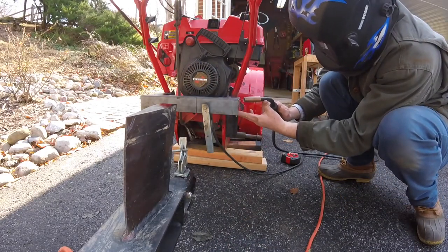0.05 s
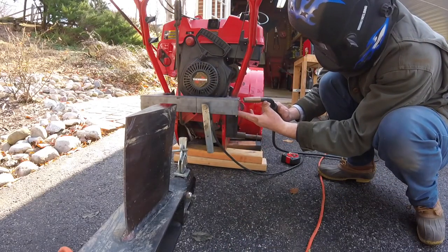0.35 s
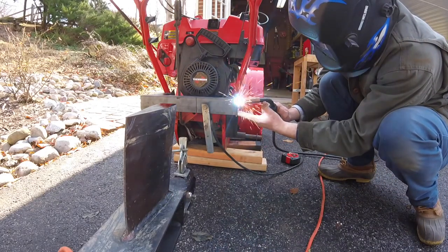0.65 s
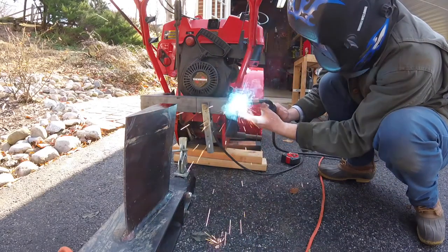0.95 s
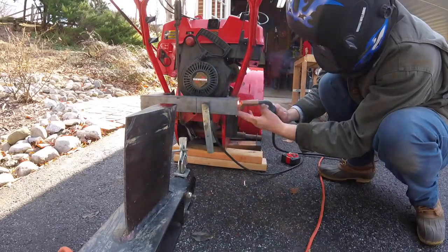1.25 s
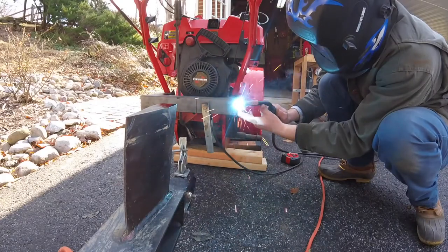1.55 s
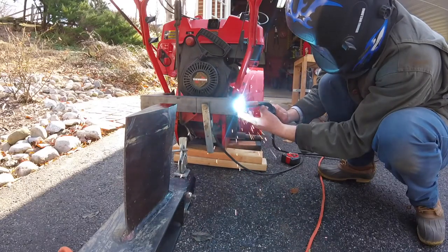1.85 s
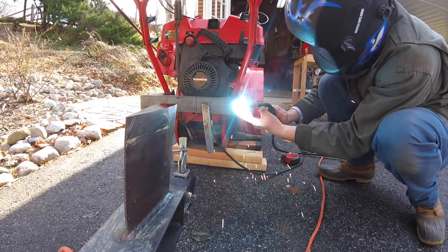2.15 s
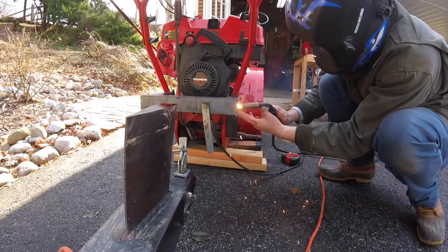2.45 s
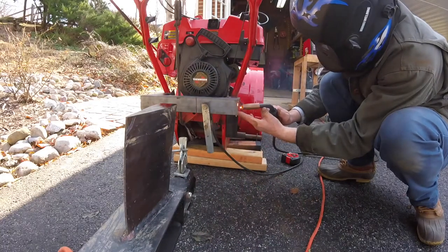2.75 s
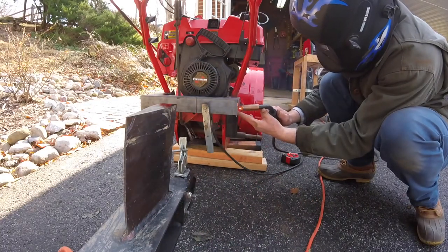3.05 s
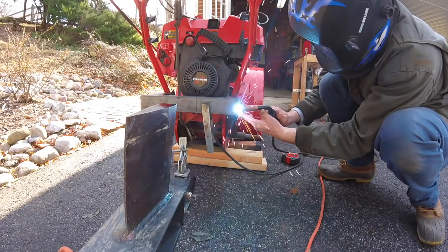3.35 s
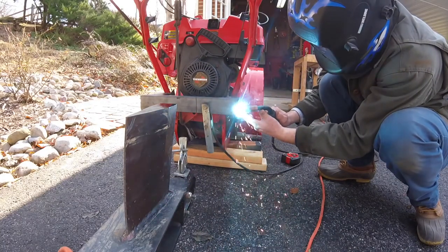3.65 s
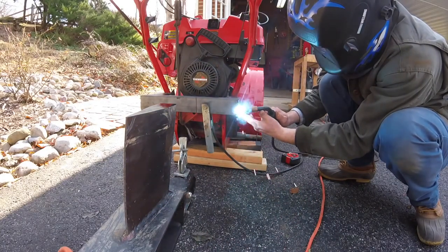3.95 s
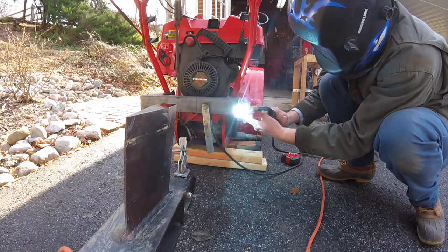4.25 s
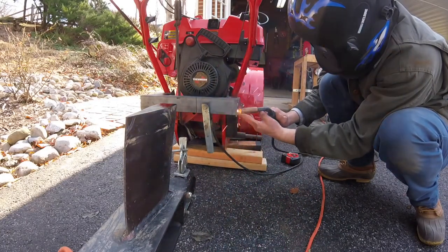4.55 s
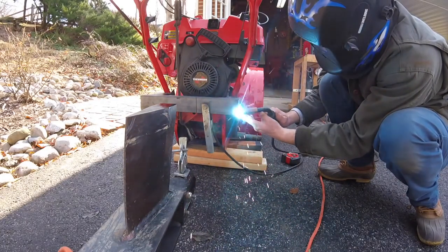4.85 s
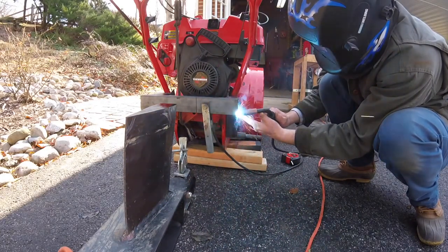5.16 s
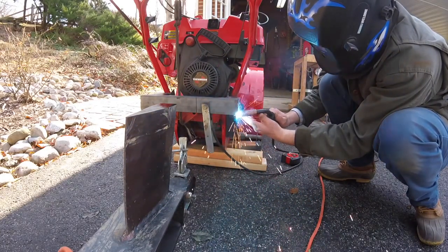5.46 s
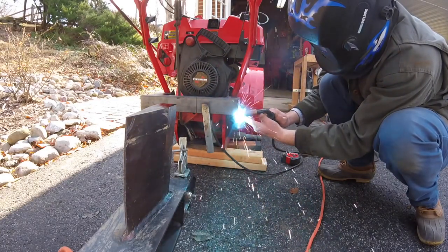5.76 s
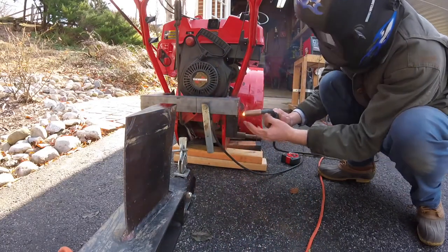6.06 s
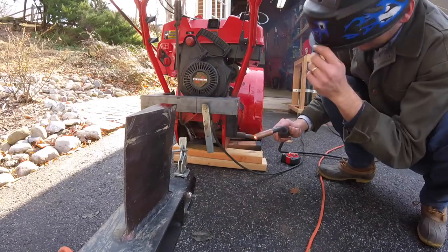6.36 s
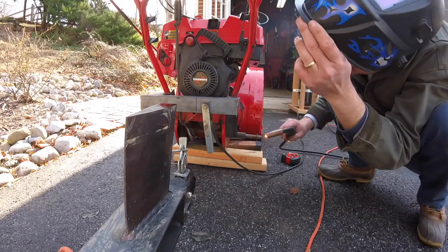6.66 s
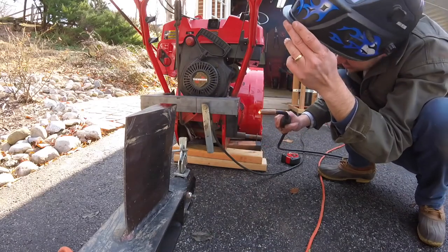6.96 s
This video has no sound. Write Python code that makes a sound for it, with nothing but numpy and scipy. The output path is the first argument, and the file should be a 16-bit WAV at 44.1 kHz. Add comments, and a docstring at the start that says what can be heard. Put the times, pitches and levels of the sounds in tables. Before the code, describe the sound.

A wire-feed welder is heard from a metre or two away in a driveway, with very little echo. Its faint fan whine, a slight electrical hum and a low rush of air continue throughout. At 0.4 seconds the torch starts hissing softly and the fan drops in pitch. Loud, sharp single pops stutter, then thicken into fast crackle from about 1.3 to 2.4 seconds. The welding pauses, the fan recovers and there are a couple of tiny ticks. A second run starts at 3.3 seconds with a burst of crackle, breaks into uneven snaps and short sputters, then settles into slightly softer, steadier crackle from 5.2 until about 5.8 seconds. The fan rises again with a faint, brief squeak. Around 6.3 seconds the welding helmet is lifted with a light knock and a soft rub, followed by another light knock at 7 seconds.

```python
"""A wire-feed welder lays two short runs on a steel bracket in a driveway, a metre or two away.
Its fan whines throughout. At 0.4 s the trigger is pulled: the torch hisses and the fan sags under load.
Each time the wire shorts and the arc strikes again it snaps: single pops while it stutters, then crackle.
A pause from 2.4 s lets the fan recover; the second run, 3.3-5.85 s, is welded at a new torch angle.
At 6.4 s the helmet is lifted with a rub and light knocks."""
import sys
import numpy as np
from scipy import signal
from scipy.fft import rfft, irfft, next_fast_len
from scipy.io import wavfile
from scipy.ndimage import map_coordinates

SR = 44100
rng = np.random.default_rng(int(sys.argv[2]) if len(sys.argv) > 2 else 0)


def log_audio(samples):
    """Write samples as a 16-bit WAV file to the path given in sys.argv[1]."""
    # one column per channel
    frames = np.atleast_2d(samples).T
    # limit to full scale, then quantise
    limited = np.clip(frames, -1, 1)
    pcm = np.round(limited * 32767).astype(np.int16)
    wavfile.write(sys.argv[1], SR, pcm)


N = 317578

# peaks and notches from arc into microphone housing: (centre [Hz], least width [Hz], gain [dB])
PATH_PEAKS = [(247, 662, 14.5), (699, 114, 9.5), (752, 85, -19), (973, 124, 7.5), (1155, 59, -6),
              (1230, 100, 6.5), (1514, 638, 17), (1658, 90, 10), (2048, 473, 10.5), (2407, 14, -33),
              (2759, 204, 11.5), (3010, 79, -22.5), (4004, 314, -13), (5040, 266, 9.5), (5353, 210, 10.5),
              (6020, 677, 16), (6650, 128, 2.5), (7030, 620, 4.5), (7620, 530, 5.5), (8970, 640, 5.5),
              (9960, 520, 12), (10430, 200, 7), (10980, 244, 12.5), (11760, 620, 7.5), (12560, 200, 3.5),
              (13180, 480, 13), (14170, 760, 12), (15500, 900, 6)]
# stutter pops, opening strikes, big drops bursting:
# (time [s], relative strength [dB], treble [dB], body [dB])
SINGLE_SNAPS = [(0.446, -28.5, -1.5, -3), (0.6672, -13.5, -1.5, -1.5), (0.7198, -7, -1.5, -8),
                (0.7814, -7.5, 2, -4), (0.9288, -9, -3.5, .5), (0.9637, -8, 3, -7), (1.1082, -9, -4, 7.5),
                (1.1567, -15.5, 4, -1), (1.2114, -5.5, 0, -7), (1.29, -10, 0.5, -6), (1.3379, -7, -6, 1.5),
                (1.4536, -16, -11, 10), (1.4924, -10, -3, -7), (1.5055, -7, -4, -3), (1.556, -10, -1, 0),
                (1.6593, -10, -13, -6), (1.6857, -10, -15, 6.5), (1.6975, -10, -9, -1.5),
                (1.7967, -7, -5, 0), (1.8246, -7.5, 0.5, 1), (1.8922, -6.5, -1.5, -0.5),
                (1.9684, -9.5, -4, 0), (2.0714, -9, -2, 4.5), (2.1664, -10, -2, 9.5),
                (2.3669, -6, -1.5, -3), (2.4055, -8, 0, -2), (3.338, -8.5, 6.5, -2),
                (3.4314, -5.5, -0.5, -5), (3.5424, -7.5, 4, -4), (3.5805, -8, 1.5, -5),
                (3.7123, -9, 1.5, -3), (3.7685, -10.5, 3, -8), (3.8347, -11, 0.5, -12),
                (3.9148, -8.5, -5, -6), (3.9359, -14, 2.5, -4), (4.0566, -9, 0.5, -6),
                (4.1997, -10, -1.5, -3), (4.2999, -8, -1, -1), (4.3158, -8, 0.5, 6), (4.416, -6.5, 2, -3),
                (4.5748, -6, -5.5, -3.5), (4.6032, -21, 3.5, 4), (4.6354, -25.5, 0, 0), (4.683, -22, 6, 2),
                (4.782, -5, -2.5, 0), (4.8014, -9.5, 0, 1), (4.9713, -12.5, 3.5, -4),
                (5.0876, -12, 1.5, 8.5), (5.1627, -12.5, -0.5, -0.5), (5.4167, -10, -5, 1),
                (5.5184, -13.5, 5, .5), (5.5806, -12.5, -8, 4), (5.705, -15.5, -1, 9), (5.7459, -10, 1, 7),
                (5.757, -12, -9, 8)]


def arc(level_db=-2.42, treble_db=-2.5, body_hz=750, spit_db=-5, ground_db=-6, yard_db=-23, far_db=-30):
    """Each re-strike is one sharp pressure pulse with a spit of molten metal, followed by its echoes."""
    # bounce off the asphalt, moving with the torch: (time [s], lag [s])
    ground_lag = [(0, .00328), (2.5, .00328), (3.2, .003115), (5.15, .003115), (5.8, .00304)]
    time_s, strength_db, bright_db, body_db = np.transpose(SINGLE_SNAPS + crackle())
    at = np.round(time_s * SR).astype(int)
    pulses, sharp, body = np.zeros((3, N))
    pulses[at] = -from_db(strength_db + level_db)
    sharp[at] = pulses[at] * from_db(treble_db + bright_db)
    body[at] = pulses[at] * (from_db(body_db) - 1)
    pulses = drop_burst(pulses)
    # long waves pass round torch and hand in one piece; each snap has its own amount of low thump
    thump = pulses + cut(body, body_hz, "low", order=1)
    thump = cut(cut(thump, 4000, "low", order=4), 150, "high")
    # short waves rattle between nozzle, hand and bracket, then bounce off the ground
    rattle = smear(sharp, lag_s=.00055, share=.6)
    rattle = smear(rattle, lag_s=.00023, share=.55)
    spit = from_db(spit_db) * dying_noise(sharp, t60_s=.025)
    crack = cut(rattle + spit, 3720, "high", order=3)
    ground = from_db(ground_db) * delayed(crack, curve(ground_lag))
    # machine, wall and garage scatter a faint tail
    yard = from_db(yard_db) * cut(dying_noise(pulses, t60_s=.18), 170, "high")
    far = from_db(far_db) * cut(dying_noise(pulses, t60_s=.192), 400, "high")
    return resonate(thump + crack + ground + yard + far, PATH_PEAKS)


def crackle(drop_db_per_doubling=2.5, scatter_db=6, max_drop_db=2, dulling_db_per_db=.8, max_snaps=256):
    """Snap rows: the wire shorts at uneven gaps; a longer wait melts a bigger drop, louder and duller."""
    # spells of steady wire feed: (start [s], end [s], rate [1/s], unevenness [0-1],
    # relative strength at start [dB], at end [dB], treble [dB], body [dB])
    spells = [(0.6737, 0.693, 260, 0.15, -18.5, -27, 3, 5.5),
              (0.9392, .9959, 200, 0.14, -12.5, -14, 2.5, 2.5),
              (1.3466, 1.374, 230, 0.34, -11.5, -11, -3, -3.5),
              (1.3942, 1.8803, 130, .45, -12.5, -12.5, -0.5, -1.5),
              (1.902, 1.956, 80, 0.18, -10, -7, -3, -1.5), (1.9829, 2.3932, 96, .3, -12, -11.5, -0.5, -2.5),
              (3.345, 3.386, 128, 0.09, -11, -10, 1.5, -.5),
              (3.4411, 3.5635, 124, 0.16, -11.5, -11, 4, -0.2),
              (3.602, 3.6686, 60, 0.04, -9.5, -12, 0.5, -3.5),
              (4.3244, 4.406, 125, 0.29, -12.5, -8, -1.5, 2),
              (4.8226, 4.8879, 78, .06, -11.5, -10.5, 0.8, -1.5),
              (4.912, 4.9393, 73, 0.08, -11.5, -13, 3, -3.5),
              (5.1738, 5.2197, 133, .1, -20.5, -20.5, 4, 0.5),
              (5.241, 5.426, 91, .12, -15.5, -15.5, 3.5, -2),
              (5.4475, 5.493, 65, 0.29, -15, -16.5, 3.5, 1.5),
              (5.539, 5.6101, 70, .25, -13.5, -18.5, 3.5, .5),
              (5.631, 5.7887, 89, 0.14, -17.5, -12.5, 2.5, -0.5)]
    longest_gap = 1.6   # in usual gaps: by then the feed has pushed the wire into the pool
    rows, single_s = [], np.array(SINGLE_SNAPS)[:, 0]
    for start_s, end_s, rate_hz, uneven, start_db, end_db, treble_db, body_db in spells:
        count = int(np.clip(round((end_s - start_s) * rate_hz) + 1, 2, max_snaps))
        wait, chance = rng.standard_normal((2, max_snaps))[:, :count]
        gaps = np.minimum(np.exp(uneven * wait), longest_gap)
        progress = (np.cumsum(gaps) - gaps[0]) / gaps[1:].sum()
        drop_db = drop_db_per_doubling * np.log2(gaps) + scatter_db * uneven * chance
        drop_db = np.minimum(drop_db - drop_db.mean(), max_drop_db)
        time_s = start_s + (end_s - start_s) * progress
        strength_db = start_db + (end_db - start_db) * progress + drop_db
        bright_db = treble_db - dulling_db_per_db * drop_db
        snaps = zip(time_s, strength_db, bright_db, np.full(count, body_db))
        # a single snap replaces any within half a gap
        rows += [snap for snap in snaps if np.abs(single_s - snap[0]).min() > .5 / rate_hz]
    return rows


def drop_burst(pulses, within_s=.0012, typical_share=.26, lowest_hz=900):
    """A drop bursts unevenly: a smaller, thinner second push gives each snap its own colour."""
    at = np.flatnonzero(pulses)
    lag = (rng.random(N) * within_s * SR).astype(int)
    share = typical_share * rng.uniform(-1.76, 2.02, N)
    push = np.zeros(N)
    push[at + 1 + lag[at]] = pulses[at] * share[at]
    return pulses + cut(push, lowest_hz, "high")


def torch(gas_db=-65, burn_db=-57, flutter_db=3):
    """The nozzle hisses while the trigger is held, more as the arc flares; the burning arc roars softly."""
    # arc flares: (start [s], length [s], level [dB])
    flares = [(0.413, 0.04, -56), (0.647, 0.03, -54), (1.29, 1.1, -53), (3.281, 0.66, -56),
              (3.85, 0.099, -59), (4.091, 0.039, -57), (4.282, 0.12, -53.5), (5.13, .68, -54)]
    # hiss at the nozzle: (frequency [Hz], relative density [dB])
    hiss_spectrum = [(500, 3.5), (1600, -12), (2400, -8), (3900, -5), (5800, -11), (8200, -7.5),
                     (11000, -7), (13200, -10), (14250, -4), (16000, -6)]
    # roar of the arc: (frequency [Hz], relative density [dB])
    burn_spectrum = [(60, -23), (170, 6), (300, 1.5), (650, -7.5), (800, -7), (1300, -8.5), (1650, -12),
                     (2300, -13.5), (4000, -35)]
    flare_power = sum(swell(*flare, attack_s=.0055, fall_db_per_s=137) ** 2 for flare in flares)
    gas_power = (from_db(gas_db) * supply_load()) ** 2
    level = np.sqrt(flare_power + gas_power) * from_db(flutter_db * drift(33))
    hiss = level * unit_rms(resonate(coloured_noise(hiss_spectrum), PATH_PEAKS))
    roar = supply_load() * from_db(burn_db) * coloured_noise(burn_spectrum)
    return hiss + roar


def torch_angle(weld):
    """The torch turns to a new angle for the second run, which stresses other treble peaks."""
    # peaks and notches at each angle: (centre [Hz], least width [Hz], gain [dB])
    first_peaks = [(4800, 270, -6.5), (5060, 370, 3), (13250, 500, 4.5), (14200, 600, -4.5)]
    second_peaks = [(4350, 360, 11), (5120, 300, -13), (5670, 140, -2), (6570, 220, 4), (13100, 560, -3),
                    (14360, 670, 5)]
    # turn of the torch: (time [s], share of second angle [0-1])
    turn = [(0, 0.04), (3.5, 0.53), (4.3, 0.8), (7.2, 1)]
    share = curve(turn)
    return (1 - share) * resonate(weld, first_peaks) + share * resonate(weld, second_peaks)


def fan(sag_hz=38.07, sag_hz_per_s=6, inertia_s=.075, waver=.0016, load_db=-2.5, flutter_db=2):
    """The welder's blade tones drop and fade under load, then keep sinking while the trigger is held."""
    # speed without load: (time [s], blade rate [Hz])
    idle = [(0, 514.3), (3, 517.4), (6.2, 517.8), (7.2, 517.6)]
    # blade tones without load: (harmonic number, level [dB])
    harmonics = [(1, -62.5), (2, -67), (3, -68.5), (4, -74), (5, -82.5)]
    held_s, load = trigger_held_s(), supply_load()
    blade_hz = curve(idle) - lagged((held_s > 0) * sag_hz + sag_hz_per_s * held_s, inertia_s)
    phase = 2 * np.pi * np.cumsum(blade_hz * (1 + waver * drift(5.9))) / SR
    tones = sum(from_db(db + load_db * load + flutter_db * drift(17)) * np.sin(k * phase)
                for k, db in harmonics)
    return np.sqrt(2) * tones


def transformer(load_db=3):
    """Mains hum, louder under load."""
    # hum without load: (frequency [Hz], level [dB])
    tones = [(240, -68), (360, -90), (600, -77)]
    t = np.arange(N) / SR
    hum = sum(from_db(db) * np.sin(2 * np.pi * (hz * t + rng.random())) for hz, db in tones)
    return np.sqrt(2) * from_db(load_db * supply_load()) * hum


def helmet(flutter_db=1.7):
    """The helmet rubs unevenly as it slides up."""
    # rub: (frequency [Hz], relative density [dB])
    rub_spectrum = [(300, -16), (800, 3), (1300, 4), (2500, -13), (4000, -15), (8000, -22), (16000, -28)]
    slide = swell(start_s=6.42, length_s=.044, level_db=-58, attack_s=.17, fall_db_per_s=85)
    return slide * from_db(flutter_db * drift(40)) * coloured_noise(rub_spectrum)


def ticks_and_squeaks():
    """Light ticks and knocks, plus a brief squeak as the fan speeds up after each run."""
    # dying bands of noise: (time [s], level [dB], centre [Hz], T60 [s])
    events = [(0.417, -50, 1960, 0.036), (0.475, -57, 6000, .015), (2.477, -50, 1760, 0.023),
              (2.728, -50.5, 5200, 0.036), (3.284, -51.5, 2176, 0.065), (5.925, -49.5, 1960, 0.035),
              (6.31, -47.5, 1270, .05), (7.017, -47, 1380, 0.045)]
    out = np.zeros(N)
    t = np.arange(SR // 5) / SR
    for time_s, db, hz, t60_s in events:
        band = unit_rms(cut(rng.standard_normal(len(t)), [hz * .7, hz * 1.4], "band"))
        puff = band * from_db(db - 60 * t / t60_s)
        at = round(time_s * SR)
        out[at:at + len(t)] += puff[:N - at]
    return out


def air(level_db=-49.5, flutter_db=.37):
    """Rush of fan air and outdoor rumble, nearly steady."""
    # rush and rumble: (frequency [Hz], relative density [dB])
    spectrum = [(13, -4), (24, -2), (55, 2.5), (140, -1.5), (220, -5), (300, -9.5), (480, -14),
                (700, -18.5), (1000, -20.5), (1600, -21.5), (1900, -23.5), (2600, -31), (6000, -36.5),
                (16000, -47.5)]
    return from_db(level_db + flutter_db * drift(5.5)) * coloured_noise(spectrum)


def trigger_held_s():
    """Time since the trigger was pulled; 0 while released."""
    # trigger held: (start [s], end [s])
    pulls = [(.41, 2.42), (3.28, 5.85)]
    t = np.arange(N) / SR
    return sum((t - start_s) * ((t > start_s) & (t < end_s)) for start_s, end_s in pulls)


def supply_load(rise_s=.033):
    """Load on the supply, 0-1, following the trigger."""
    return lagged(trigger_held_s() > 0, rise_s)


def from_db(db):
    return 10 ** (np.asarray(db) / 20)


def unit_rms(x):
    return x / np.sqrt(np.mean(x ** 2) + 1e-20)


def curve(rows):
    """(time [s], value) rows, interpolated per sample."""
    return np.interp(np.arange(N) / SR, *np.transpose(rows))


def cut(x, hz, kind, order=2):
    """Butterworth filter."""
    return signal.sosfilt(signal.butter(order, hz, kind, fs=SR, output="sos"), x + 1e-18)


def drift(rate_hz):
    """Slow random wander, rms 1."""
    hop, settle = 40, 2000
    pole = np.exp(-2 * np.pi * rate_hz * hop / SR)
    white = rng.standard_normal(N // hop + settle + 2)
    slow = signal.lfilter([1], [1, -2 * pole, pole * pole], white)[settle:]
    return np.interp(np.arange(N) / hop, np.arange(len(slow)), unit_rms(slow))


def coloured_noise(spectrum):
    """Noise with the given spectral shape, rms 1."""
    hz, level_db = np.transpose(spectrum)
    size = next_fast_len(N)
    bins_hz = np.maximum(np.arange(size // 2 + 1) * SR / size, 1)
    gain = from_db(np.interp(np.log(bins_hz), np.log(hz), level_db))
    return unit_rms(irfft(rfft(rng.standard_normal(size)) * gain, size)[:N])


def dying_noise(clicks, t60_s):
    """Each click becomes a dying puff of noise of the same energy."""
    pole = from_db(-120 / (t60_s * SR))
    power = signal.lfilter([1 - pole], [1, -pole], clicks ** 2 + 1e-18)
    return np.sqrt(power) * rng.standard_normal(N)


def delayed(x, lag_s):
    """Delay whose lag may move."""
    return map_coordinates(x, [np.arange(N) - lag_s * SR], order=3)


def resonate(x, peaks):
    """Chain of peaks and notches; tall peaks are widened to stay well damped."""
    sections = []
    for hz, width_hz, gain_db in peaks:
        g = from_db(gain_db / 2)
        width_hz = max(width_hz, 55 * g * g)
        a = np.tan(np.pi * width_hz / SR)
        c = -2 * np.cos(2 * np.pi * hz / SR)
        sections.append(np.array([1 + a * g, c, 1 - a * g, 1 + a / g, c, 1 - a / g]) / (1 + a / g))
    return signal.sosfilt(sections, x + 1e-18)


def smear(x, lag_s, share):
    """Allpass: quick bounces between near surfaces spread a pulse in time and keep its colour."""
    echo = np.zeros(round(lag_s * SR) + 1)
    echo[0], echo[-1] = 1, share
    return signal.lfilter(echo[::-1], echo, x + 1e-18)


def swell(start_s, length_s, level_db, attack_s, fall_db_per_s):
    """Gain that rises up to the start, holds, then dies away."""
    t = np.arange(N) / SR - start_s
    rise = np.clip(1 + t / attack_s, 0, 1)
    return rise * from_db(level_db - fall_db_per_s * np.maximum(t - length_s, 0))


def lagged(x, lag_s):
    """First-order inertia."""
    pole = np.exp(-1 / (lag_s * SR))
    return signal.lfilter([1 - pole], [1, -pole], x + 1e-18)


def scene():
    """The weld over machine, handling and air; mono."""
    background = air()
    weld = torch_angle(arc() + torch())
    return (weld + fan() + transformer() + helmet() + ticks_and_squeaks() + background)[None]


def record(dry):
    """Steep low-pass."""
    cutoff_hz = 15780
    return signal.sosfilt(signal.ellip(10, .2, 70, cutoff_hz, fs=SR, output="sos"), dry)


dry = scene()
out = record(dry)
log_audio(out)
```